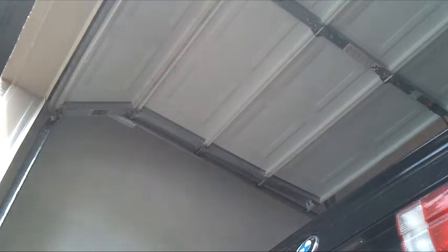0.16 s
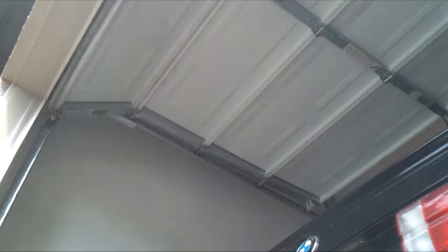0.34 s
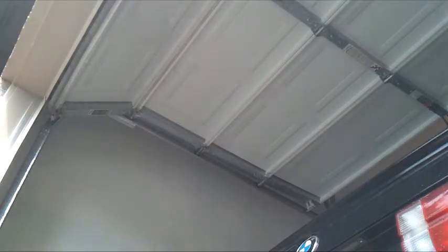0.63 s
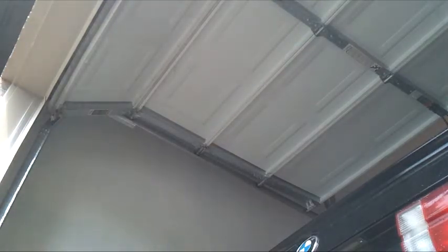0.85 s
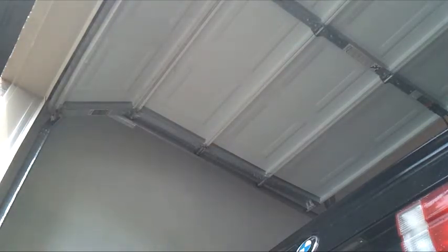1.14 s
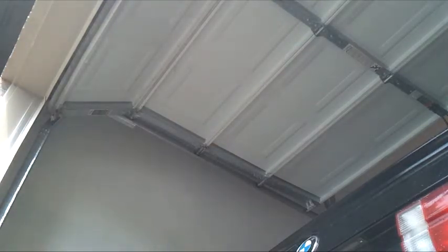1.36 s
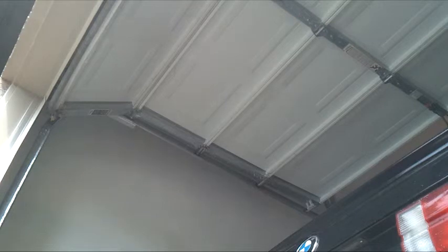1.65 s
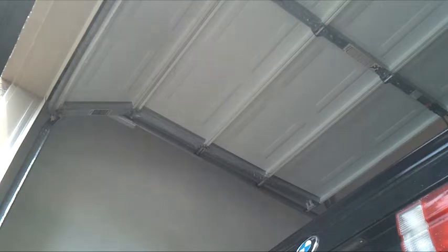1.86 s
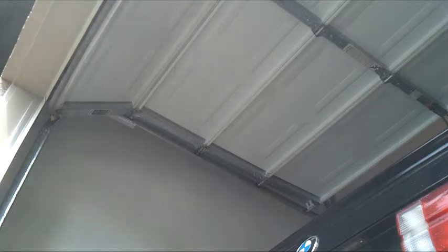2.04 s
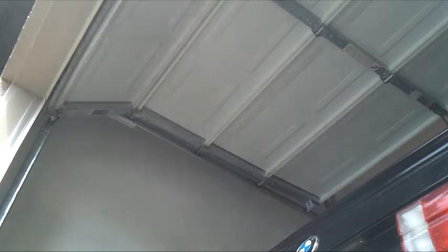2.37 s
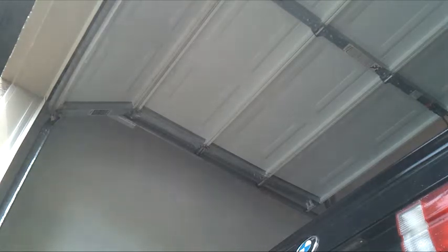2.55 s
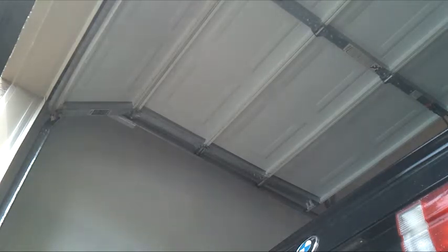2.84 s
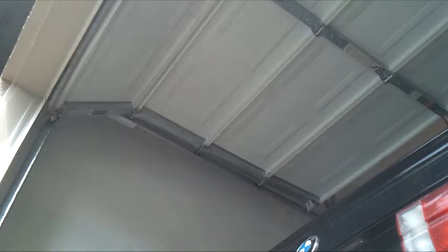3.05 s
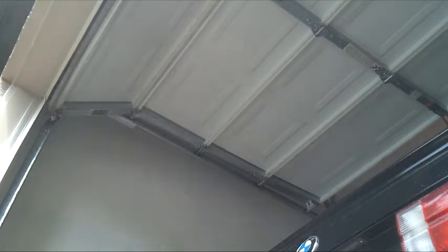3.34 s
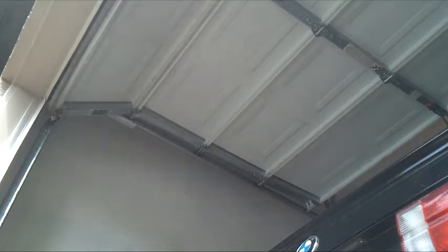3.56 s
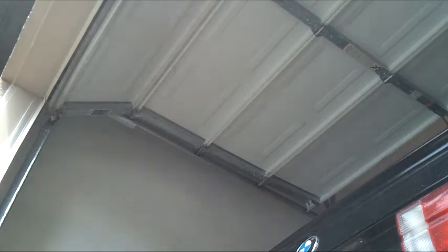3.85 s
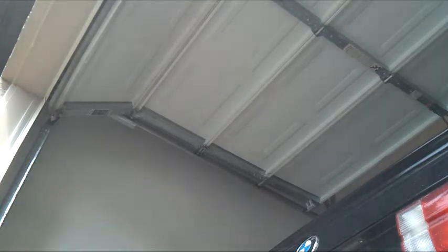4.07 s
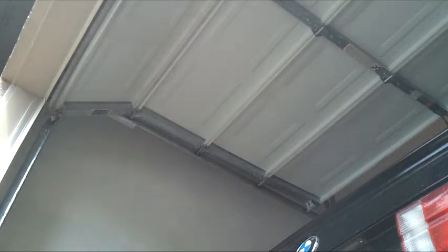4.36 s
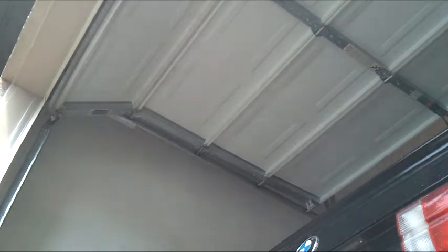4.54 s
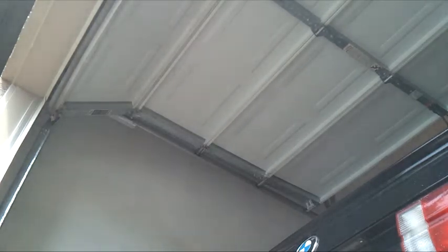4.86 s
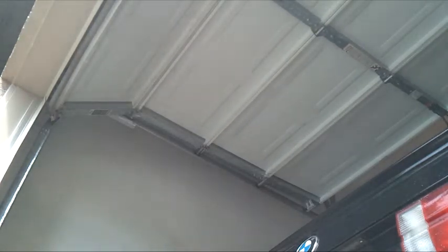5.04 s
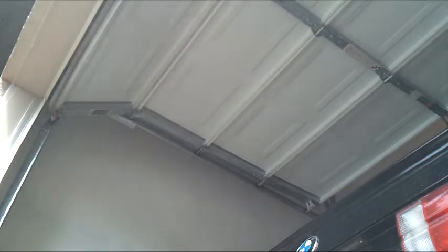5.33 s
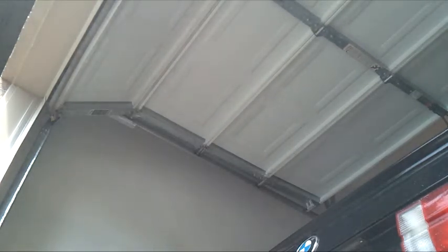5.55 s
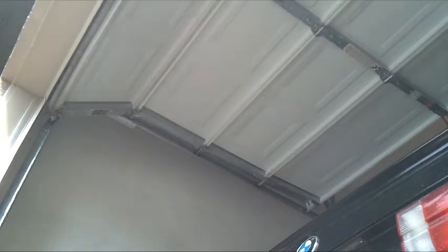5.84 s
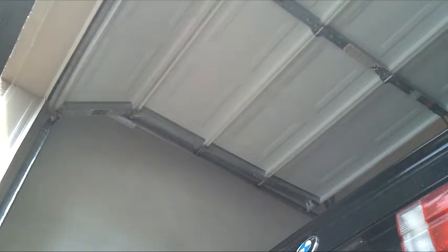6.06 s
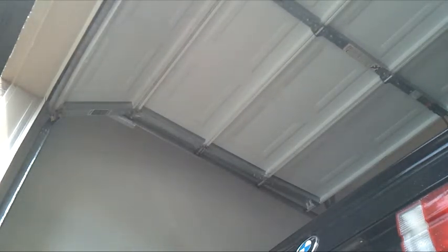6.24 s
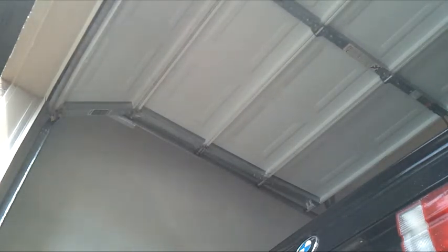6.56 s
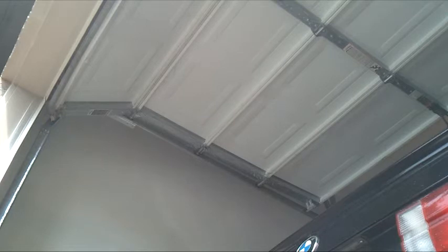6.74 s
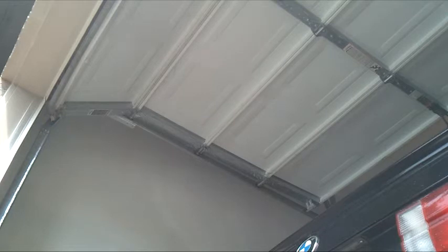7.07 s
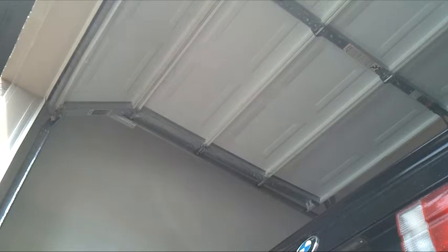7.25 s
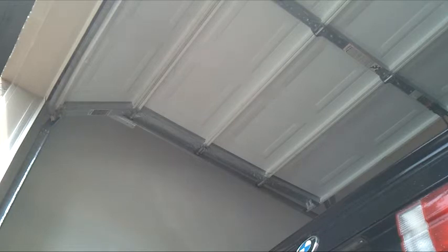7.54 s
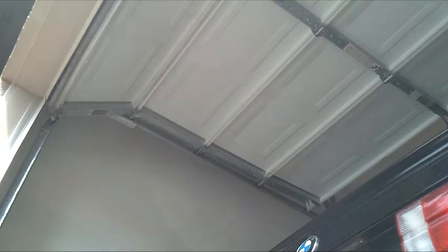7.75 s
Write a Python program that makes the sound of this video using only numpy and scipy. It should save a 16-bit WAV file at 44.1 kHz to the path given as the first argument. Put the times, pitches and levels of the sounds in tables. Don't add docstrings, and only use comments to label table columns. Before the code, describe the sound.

A car engine with a loud exhaust idles in a low uneven burble, then pops and revs up hard in a garage.

```python
import sys
import numpy as np
from scipy import signal
from scipy.fft import rfft, irfft
from scipy.io import wavfile
from scipy.ndimage import uniform_filter1d, minimum_filter1d

SR = 44100
rng = np.random.default_rng(int(sys.argv[2]) if len(sys.argv) > 2 else 0)


def gain_from_db(level_db):
    decades = np.asarray(level_db, float) / 20
    return 10 ** decades


def wav_record(signal):
    frames = np.transpose(np.atleast_2d(signal))
    bounded = np.clip(frames, -1, 1)
    quanta = np.round(bounded * 32767).astype(np.int16)
    wavfile.write(sys.argv[1], SR, quanta)


N = 348390
T = np.arange(N) / SR

# time in seconds, firings per second.
REV = [(5.45, 40.6), (5.6, 54), (5.85, 96), (5.98, 120.5), (6.09, 135.4), (6.25, 155.8), (6.41, 169.8),
       (6.79, 193.5), (7.01, 203.8), (7.13, 217.5), (7.3, 248.7), (7.44, 276.5), (7.5, 273), (7.57, 261.6),
       (7.6, 266.9), (7.78, 249), (7.9, 232.3)]
CYLINDER = [0.67, 1.5, -0.19, 1.15, -0.76, -1.7]
VALVES = [1, 0.63, -0.58, 0.44, -0.73, -0.26]
# frequency in Hz, width in Hz, level in dB.
PIPE = [(151, 72, -18), (166, 2.8, -26), (197.4, 12.2, -6), (237.8, 13.2, 0), (259.8, 27.6, 5.5),
        (285, 19.3, -4), (355, 37, -10.5), (337.5, 20, -6), (402, 14, -11), (465, 29.3, 4),
        (503.5, 20.4, 2), (530.2, 12.9, 3.5), (601, 27.5, -7), (665, 12, -22), (820, 50, -16),
        (960, 42, -36.5), (1070, 50, -18), (1233, 76, -20), (1480, 350, -29), (1910, 120, -31)]
# time in seconds, level in dB.
POPS = [(5.618, -3), (5.645, 0), (5.659, -13.5), (5.684, -11), (5.775, -2), (5.829, -4.5), (5.856, -9.5),
        (7.484, -9), (7.508, -26), (7.527, -8), (7.547, -10.5), (7.575, -27.5), (7.678, -14)]
# time in seconds, level in dB.
SLAMS = [
    (5.6255, 1),
    (5.6625, 0),
    (5.6885, -2),
    (5.6928, 4),
    (5.7815, -3),
    (5.7895, -2),
]
# frequency in Hz, density in dB per Hz.
RASP = [(560, -3.5), (800, -1), (1200, -2.5), (2000, -7.5), (3000, -14), (4200, -15.5)]
HISS = [(700, -7), (1050, -17), (1300, -1.5), (1600, -13), (1950, -7.5), (2500, -13), (3200, -8.5),
        (4000, -9), (5500, -8.5), (6900, -8.5)]
RUMBLE = [(12, -70), (22, -42), (65, -8), (151, -18), (248, -2), (341, -16), (393, -17), (476, -11),
          (665, -23), (900, -22), (1170, -52), (1980, -120)]
# frequency in Hz, gain in dB.
OPEN_HISS = [(1500, 1.5), (2600, 0), (3600, -6.5), (5000, 2.5), (5800, 4), (6900, -5)]
# frequency in Hz, width in Hz, level in dB.
WHINE = [(2955, 12, -57), (1850, 15, -58), (3650, 15, -59), (3850, 600, -44)]
# frequency in Hz, gain in dB.
MIRROR = [(9090, -12), (9600, -15), (10200, -22.5), (11000, -29), (12000, -38.5), (13000, -60),
          (14200, -102)]
# time in seconds, level in dB.
LOAD = [(0, -33.5), (.15, -32), (.6, -36.5), (1.4, -27), (2.2, -29.5), (5.45, -30.5), (5.58, -21),
        (5.66, -18), (5.72, -20.5), (5.79, -11), (5.87, -21), (6.1, -22.5), (6.4, -25), (6.65, -25),
        (6.9, -22), (7.13, -19.5), (7.45, -24), (7.9, -17)]
# time in seconds, level in dB over idle.
THROTTLE = [(5.45, -0.5), (5.62, 7), (5.87, 10.5), (5.97, 6.5), (6.03, 4), (6.3, 7.5), (6.5, 5.5),
            (6.9, 11), (7.05, 13), (7.13, 16), (7.2, 17), (7.42, 17.5), (7.55, 18.5), (7.66, 15),
            (7.75, 16), (7.9, 17)]
# middle in seconds, half length in seconds, added chance in dB,
# added bank-against-bank unevenness in dB.
SPELLS = [
    (0.505, 1, 4.5, 3),
    (5.702, 0.13, 11, 14.5),
    (6.174, 0.085, 8, 19.5),
    (6.81, 0.28, 9, 29.5),
    (7.546, .05, 9.5, 4),
    (7.706, 0.022, 7, 2.5),
]
# frequency in Hz, width in Hz, level in dB.
NOTES = [(111, 45, -34.5), (167.3, 11, -23), (269, 42.5, -12.5), (324, 52, -26), (449, 49, -13),
         (498.6, 33, -12.5), (540.3, 30, -18), (608.5, 19, -19), (710, 41, -27.5), (819, 50, -20),
         (374, 48, -22.5), (1120, 50, -35.5), (1140, 40, -27), (1240, 53, -24.5)]
ORDER_DB = [2, 2.5, 3.5, -3, -4.5, -5, -8, -11]
# multiple of the firing rate, level in dB.
IDLE_LINES = [(5, -45), (6, -35.5), (6.5, -37.5), (12, -45.5)]
# sixths of the firing rate, level in dB.
SUB_ORDERS = [(3, -5.5), (4, -15.5), (5, -12)]
# middle in seconds, half length in seconds, order, gain in dB.
STUMBLES = [(5.93, .07, 7, -10), (6.97, .08, 4, -8.5), (6.44, .04, 5, -8), (6.34, 0.068, 2, -3),
            (6.4, .12, 7, -5.5), (6.0, .15, 3, -7.5), (7.476, 0.016, 2, -8), (7.531, 0.072, 3, -15),
            (7.556, 0.025, 1, -13), (7.558, .037, 2, 7), (7.631, .04, 2, -19), (5.93, .05, 2, 6),
            (6.49, 0.036, 2, 5.5), (7.335, .02, 2, -10), (7.69, .025, 2, -10), (7.76, 0.046, 2, -1.5),
            (7.27, 0.047, 1, -4.5), (7.39, .03, 1, -6), (7.8, .07, 1, -2.5), (7.1, .04, 1, -11),
            (5.9, .05, 1, -9), (6.18, 0.036, 3, -6), (9.9, 0.027, 3, -5.5), (6.35, .09, 5, -10.5),
            (5.9, .04, 5, -9.5), (7.0, .07, 6, -9), (7.8, .06, 5, -9)]
# middle in seconds, half length in seconds, order, level in dB.
SWELLS = [(5.84, .045, 5, -19), (5.83, .045, 3, -19.5), (5.93, 0.043, 6, -30.5), (5.665, .022, 7.5, -16),
          (6.27, .04, 3, -23), (7.55, .03, 2, -22.5), (6.22, 0.061, 1.5, -26.5), (6.66, 0.11, 1.5, -18.5),
          (6.82, .07, 1.5, -30.5), (6.97, .06, 1.5, -24.5), (6.26, 0.065, 2.5, -32),
          (6.69, 0.18, 2.5, -20.5), (6.93, 0.073, 2.5, -26), (7.05, .05, 2.5, -18), (6.13, 0.034, 3.5, -18),
          (5.8, 0.044, 3.5, -18), (6.55, 0.094, 3.5, -34.5), (6.85, .05, 3.5, -33.5), (5.94, .05, 4.5, -26),
          (6.7, 0.042, 4.5, -33), (7.33, .05, 4.5, -35.5), (6.83, 0.095, 5.5, -31.5), (7.13, .09, 5.5, -34),
          (6.31, 0.058, 6.5, -31), (6.42, 0.065, 7, -37.5), (6.4, .04, 5, -23.5), (7.28, .03, 5, -33.5),
          (6.4, .04, 6, -31.5), (7.1, 0.043, 7, -33.5), (7.5, .04, 5, -32.5)]
# middle in seconds, half length in seconds, gain in dB.
BLASTS = [(.3, .04, 1.5), (.68, 0.091, -1), (5.68, 0.022, 2.5), (5.758, 0.022, 0), (5.84, .03, 1.5),
          (6.14, .02, 1.5), (7.115, .035, 3.5), (7.18, .02, 2.5), (7.42, .03, 3.5), (7.5, .015, 2),
          (7.568, 0.027, 4), (7.63, 0.027, -1), (7.784, .03, 1.5), (7.87, .03, 2)]
# time in seconds, depth in dB.
DUCKS = [
    (5.629, 8),
    (5.697, 6.5),
    (5.793, 4.5),
    (6.01, 4),
    (7.605, 3),
]
# buffer number, level in dB.
JOINS = [(2, -3), (4, -12), (7, -9), (8, -9), (10, -7), (18, -10), (19, -13), (25, -12), (26, -13), (29, 0),
         (30, -4), (39, -16), (43, -13), (45, -3), (46, -8), (47, 0), (52, -10), (53, -16), (54, 0),
         (55, 3), (56, -1), (58, -1)]

IDLE_RATE = 39.3


def evened(x):
    return x / np.sqrt(np.mean(x ** 2))


def steadied(x):
    return x / np.sqrt(uniform_filter1d(uniform_filter1d(x ** 2, size=5000), size=5000))


def ramp(x, low, span):
    return np.clip((x - low) / span, 0, 1)


def bump(middle_s, half_s, power=2):
    return np.exp(-((T - middle_s) / half_s) ** power)


def curve(rows, axis):
    rows = np.array(rows)
    return np.interp(T, rows[:, 0], rows[:, axis])


def flicker(size):
    return evened(uniform_filter1d(uniform_filter1d(rng.standard_normal(N), size), size))


def coloured(x, points, low_hz=0, high_hz=SR):
    hz = np.fft.rfftfreq(N, 1 / SR)
    f, db = np.transpose(points)
    gain = gain_from_db(np.interp(np.log(hz + 1), np.log(f), db))
    gain = gain * (hz >= low_hz) * (hz <= high_hz)
    return irfft(rfft(x) * gain, N)


def resonate(x, hz, width):
    r = np.exp(-np.pi * width / SR)
    return 2 * signal.lfilter([1 - r], [1, -r * np.exp(2j * np.pi * hz / SR)], x).real


def garage(x, t60=.45):
    taps = np.zeros(12000)
    taps[np.arange(300, 11900, 22) + rng.integers(0, 22, 528)] = rng.choice([-1., 1.], 528)
    taps *= gain_from_db(-60 * T[:12000] / t60)
    return signal.oaconvolve(x, taps / np.linalg.norm(taps))[:N]


def engine_speed():
    hunt = 1.3 * np.cos(2 * np.pi * (T - 1.6) / 1.92)
    idle = IDLE_RATE + hunt + 4 * bump(0, .3) - 9.5 * bump(.7, .37)
    return np.where(T < REV[0][0], idle, curve(REV, axis=1))


def body_rumble(speed):
    shake_db = -36 - .3 * (speed - 40)
    rumble = gain_from_db(shake_db) * evened(coloured(rng.standard_normal(N), RUMBLE, high_hz=777))
    drum_hz, drum_width_hz = 82, 36
    drum = resonate(rng.standard_normal(N), drum_hz, drum_width_hz)
    drum = resonate(drum, drum_hz, drum_width_hz)
    return rumble + gain_from_db(-49.5) * ramp(T, 7.38, .1) * evened(drum)


def rasp_noise(firings):
    puff = .5 + 0.13 * np.exp(-(firings % 1) / 0.55)
    rasp = coloured(puff * rng.standard_normal(N), RASP, low_hz=533)
    return rasp / np.sqrt(np.mean(coloured(rasp, [(1, 0)], 800, 2200) ** 2))


def valve_hiss(firings, speed):
    ticks = 1 + (0.17 + .9 * ramp(speed, 150, 100)) * np.exp(-(firings % 1) / 0.091)
    hiss = evened(coloured(ticks * rng.standard_normal(N), HISS, low_hz=594))
    hiss = evened(hiss + .7 * garage(hiss, t60=.08))
    return hiss + ramp(speed, 50, 40) * (coloured(hiss, OPEN_HISS) - hiss)


def accessory_whine():
    return sum(gain_from_db(db) * evened(resonate(rng.standard_normal(N), hz, width)) for hz, width, db in WHINE)


def gas_noise(firings, rasp_db, hiss_db):
    speed = np.gradient(firings) * SR
    rasp = rasp_noise(firings)
    valves_db = uniform_filter1d(np.take(VALVES, firings.astype(int) % 6), size=300)
    hiss = valve_hiss(firings, speed)
    whine = accessory_whine()
    fade_db = np.clip(.06 * (speed - 45), 0, 6)
    rasp_db = rasp_db + 2.5 + 0.91 * flicker(size=400)
    hiss_db = hiss_db + 8.5 + valves_db
    hiss_db = hiss_db + 0.6 * flicker(size=200) + 0.54 * flicker(size=3000) + 0.67 * flicker(size=900)
    return gain_from_db(rasp_db) * rasp + gain_from_db(0.8 * valves_db - fade_db) * whine + gain_from_db(hiss_db) * hiss


def pipe(x):
    rung = np.zeros(N)
    for k, (hz, width, db) in enumerate(PIPE):
        rung += (-1) ** k * gain_from_db(db) * resonate(x, hz, width)
    return signal.sosfilt(signal.butter(4, 125, "high", fs=SR, output="sos"), rung)


def pops():
    ring, slam = np.zeros(N), np.zeros(N)
    for s, db in POPS:
        ring[round(s * SR)] = -gain_from_db(db)
    for s, db in SLAMS:
        slam[round(s * SR)] = -gain_from_db(db)
    t = T[:801] - T[400]
    suck = np.exp(-(t / .0007) ** 2) - .2 * np.exp(-(t / .003) ** 2)
    crack = gain_from_db(-10) * coloured(.4 * ring + 0.56 * slam, [(800, -9.5), (3000, 2.0), (7000, -9.5)])
    return 90 * pipe(ring) + crack + signal.oaconvolve(slam, suck, "same")


def ragged(axis):
    t = T[::200]
    return np.interp(T, t, sum(row[axis] * np.exp(-((t - row[0]) / row[1]) ** 4) for row in SPELLS))


def unevenness(loaded, rough_db, lope_db):
    chance = gain_from_db(-14 - 7 * loaded + rough_db)
    bank = gain_from_db(-4 - 13.5 * loaded + lope_db)
    own = gain_from_db(-3.5 - 17.5 * loaded + 0.71 * lope_db)
    return chance, bank, own


def firing_pulses(firings, step, chance, bank, own):
    at = np.flatnonzero(np.diff(np.floor(firings))) + 1
    k = np.floor(firings[at]).astype(int)
    luck = rng.standard_normal((2000, 2))[:len(k)].T
    size = 1 + bank[at] * (-1.) ** k + own[at] * np.take(CYLINDER, k % 6) + .6 * chance[at] * luck[0]
    late = .05 * chance[at] * luck[1] - firings[at] + k
    place = np.clip(at + late / step[at], 0, N - 2)
    pulses = np.zeros(N)
    pulses[place.astype(int)] += size * (1 - place % 1)
    pulses[place.astype(int) + 1] += size * (place % 1)
    return pulses


def boom_note(pulses, speed, loaded, lope_db, second_order):
    boom = steadied(resonate(resonate(pulses, 78, 26), 78, 26))
    level_db = -39.5 + 1.36 * np.clip(speed - IDLE_RATE, -1.6, 2.4) + loaded * (-4.5 + 0.36 * lope_db)
    level_db = level_db - 20 * ramp(speed, 100, 28) - 15.5 * ramp(speed, 192, 12)
    return gain_from_db(level_db) * steadied(boom + 2 * (1 - loaded) * second_order)


def order_tones(firings, speed, flow_db, loaded, own, rough_db, lope_db, revved):
    hz = np.arange(2000.)
    lift = np.sqrt(sum((gain_from_db(db) / (1 + (2 * (hz - f) / width) ** 2)) ** 2 for f, width, db in NOTES))
    sizes = []
    for n, db in enumerate(ORDER_DB):
        bright_db = 0.045 * n * (flow_db - 16.5) / 2
        lost_db = 0.94 * rough_db / (n + 1) + 0.096 * lope_db
        sizes.append(revved * np.interp((n + 1) * speed, hz, lift) * gain_from_db(db + bright_db - lost_db))
    for s, half_s, order, db in STUMBLES:
        n = int(round(order)) - 1
        sizes[n] = sizes[n] * gain_from_db(db * ramp(half_s - abs(T - s), 0, .008))
    tones = np.sqrt(2) * sum(size * np.sin(2 * np.pi * (n + 1) * firings) for n, size in enumerate(sizes))
    for sixths, db in SUB_ORDERS:
        share = round(sixths) / 6
        size = revved * np.minimum(own, 1) * gain_from_db(db) * np.interp(share * speed, hz, lift)
        tones += size * np.sin(2 * np.pi * share * firings)
    idle = np.sqrt(2) * (1 - loaded) * gain_from_db(1.36 * np.minimum(speed - IDLE_RATE, 0))
    tones += idle * sum(gain_from_db(db) * np.cos(np.pi * round(2 * order) * firings) for order, db in IDLE_LINES)
    for s, half_s, order, db in SWELLS:
        near = slice(round((s - 2 * half_s) * SR), round((s + 2 * half_s) * SR))
        swell = np.exp(-((T[near] - s) / half_s) ** 4)
        tones[near] += np.sqrt(2) * gain_from_db(db) * swell * np.sin(np.pi * round(2 * order) * firings[near])
    return tones


def exhaust(firings, level_db, flow_db):
    step = np.gradient(firings)
    speed = step * SR
    loaded, rough_db, lope_db = ramp(speed, 42, 33), ragged(axis=2), ragged(axis=3)
    chance, bank, own = unevenness(loaded, rough_db, lope_db)
    pulses = firing_pulses(firings, step, chance, bank, own)
    revved = ramp(T, 5.78, .06)
    count = len(ORDER_DB)
    waves = [np.cos(2 * np.pi * (n + 1) * firings) for n in range(count)]
    halves = sum(np.cos(2 * np.pi * (n + .5) * firings) for n in range(count))
    linger = signal.lfilter([1], [1, -.9985], abs(pulses))
    smear = linger * rng.standard_normal(N) * chance * gain_from_db(-25)
    drive = pulses - revved * 2 * step * (sum(waves) + bank * halves) + smear
    light = np.clip((57 - speed) / 17, 0, 1)
    rounded = 22 * signal.lfilter([.02], [1, -.98], drive)
    rung = pipe(light * rounded + (1 - light) * drive)
    rung -= ramp(speed, 140, 50) * resonate(rung, 260, 90) / 2
    tones = order_tones(firings, speed, flow_db, loaded, own, rough_db, lope_db, revved)
    boom = boom_note(pulses, speed, loaded, lope_db, waves[1])
    return gain_from_db(level_db) * steadied(rung + 0.69 * garage(rung)) + gain_from_db(-0.4) * tones + boom


def scene():
    speed = engine_speed()
    firings = np.cumsum(speed) / SR + 5.87
    flow_db = curve(THROTTLE, axis=1)
    hiss_db = -38.5 + 0.68 * flow_db - 8 * ramp(speed, 50, 70) + 0.15 * np.minimum(speed - IDLE_RATE, 0)
    hiss_db = hiss_db + 3.5 * bump(5.73, 0.079)
    blast_db = sum(db * bump(s, half_s) for s, half_s, db in BLASTS)
    rasp_db = -41.5 + flow_db + blast_db + 3.5 * bump(5.845, 0.046)
    blows = pops()
    engine = exhaust(firings, curve(LOAD, axis=1) + 0.86, flow_db) + blows + gain_from_db(3.5) * garage(blows)
    gas = gas_noise(firings, rasp_db, hiss_db + blast_db)
    return (engine + gas + body_rumble(speed))[None]


def limiter(x):
    fall = T * 130
    held_db = np.maximum.accumulate(20 * np.log10(abs(x) + 1e-6) + fall) - fall
    duck_db = np.roll(uniform_filter1d(np.maximum(held_db + 1.8, 0), size=60), 70)
    snap_db = sum(db * ramp(T, s, 0.0041) * np.exp(-np.maximum(T - s, 0) / .035) for s, db in DUCKS)
    limited = np.tanh(x / gain_from_db(1.2 * duck_db + snap_db) / 1.8) * 1.8
    peak = uniform_filter1d(-minimum_filter1d(-abs(limited), size=260), size=200)
    excess_db = np.maximum(20 * np.log10(peak + 1e-6) + 7.5, 0)
    return limited / gain_from_db(.8 * ramp(T, 5.88, .05) * excess_db)


def buffer_joins():
    joins = np.zeros(N)
    for k, db in JOINS:
        joins[round((.006 + k * .128) * SR)] = gain_from_db(-29.5 + db)
    return coloured(joins, [(1, 0)], 6900, 9090)


def band_limit(x):
    return signal.sosfilt(signal.butter(12, 14100, fs=SR, output="sos"), x)


def record(dry):
    kept = coloured(limiter(dry[0]), [(1, 0)], 0, 6900)
    image = coloured(2 * kept * np.cos(2 * np.pi * 16000 * T), MIRROR, 9090, 14200)
    mix = kept + image + buffer_joins()
    return band_limit(mix[None])


dry = scene()
out = record(dry)
wav_record(out)
```